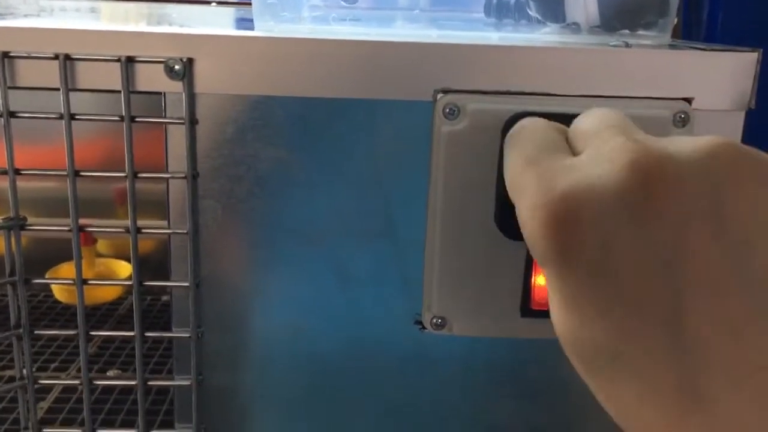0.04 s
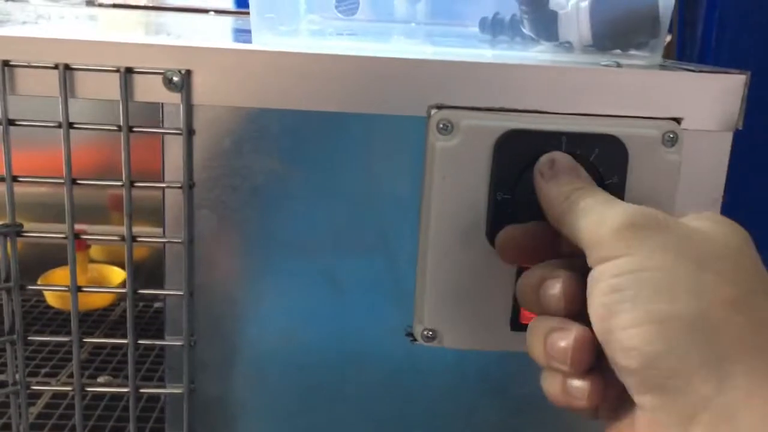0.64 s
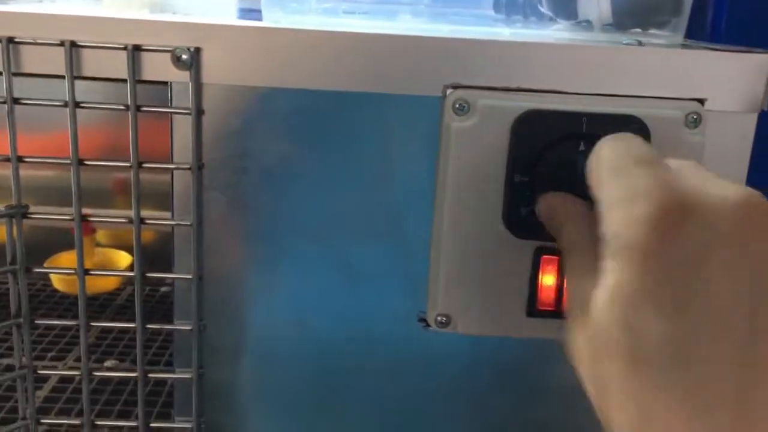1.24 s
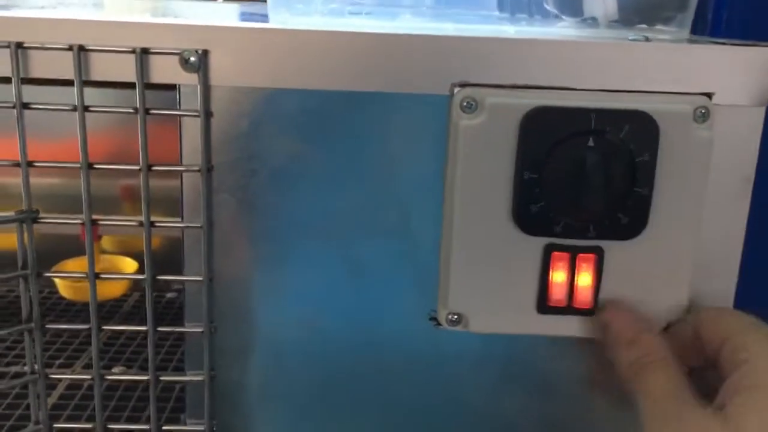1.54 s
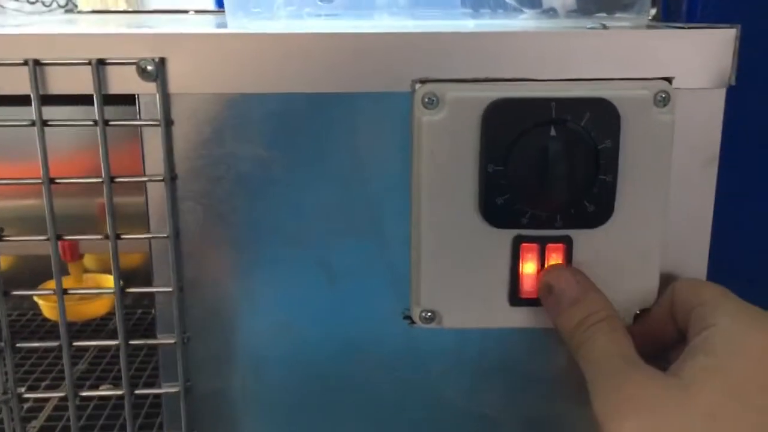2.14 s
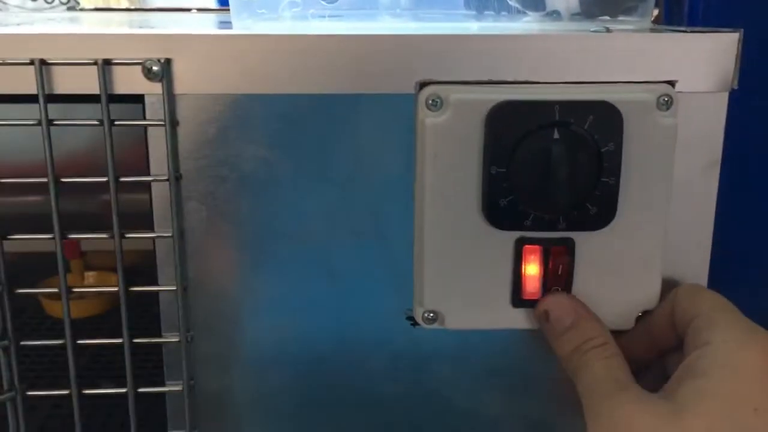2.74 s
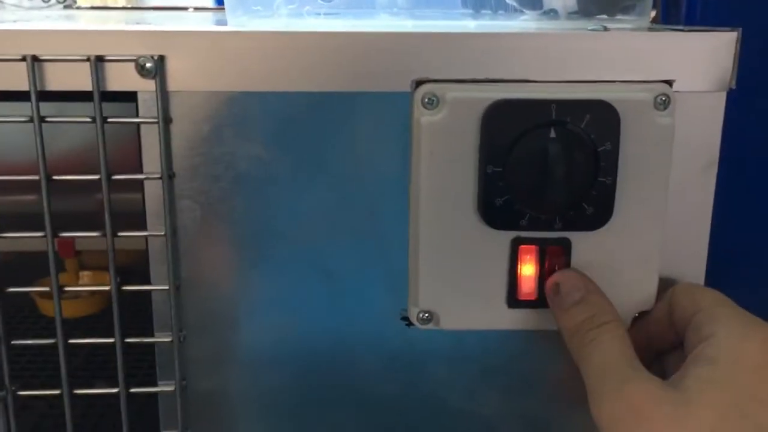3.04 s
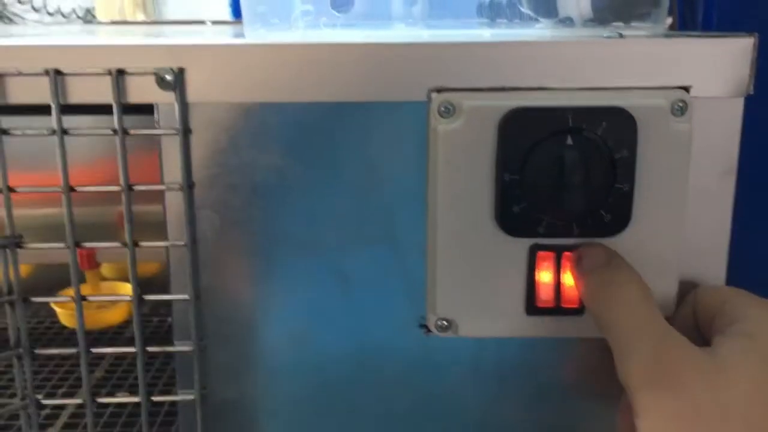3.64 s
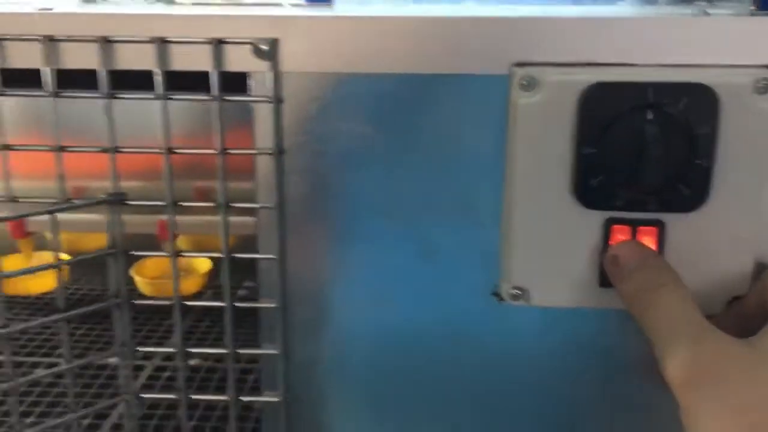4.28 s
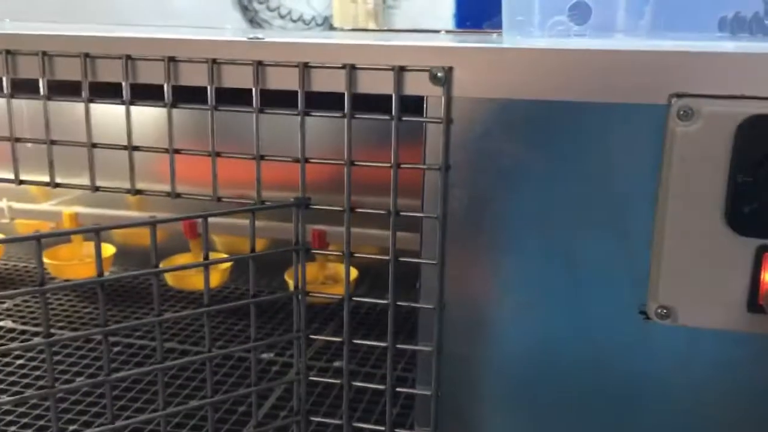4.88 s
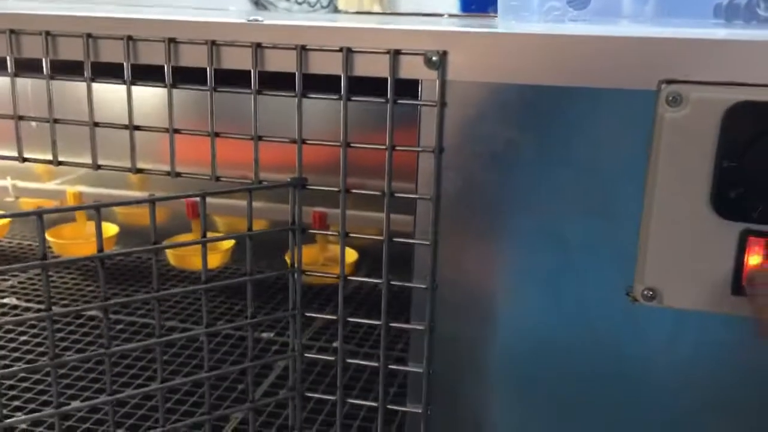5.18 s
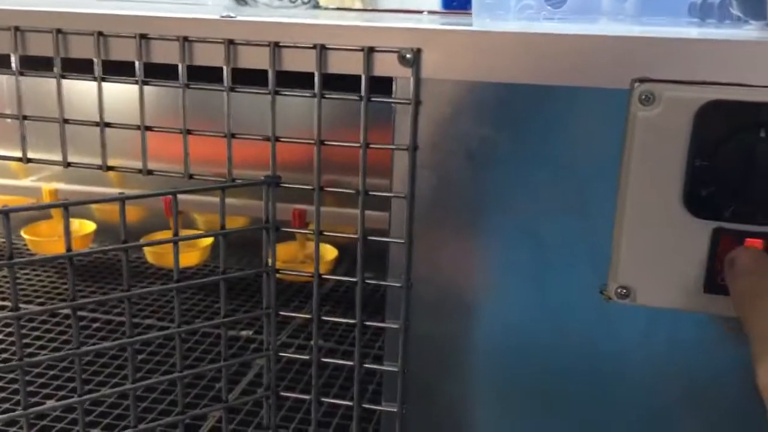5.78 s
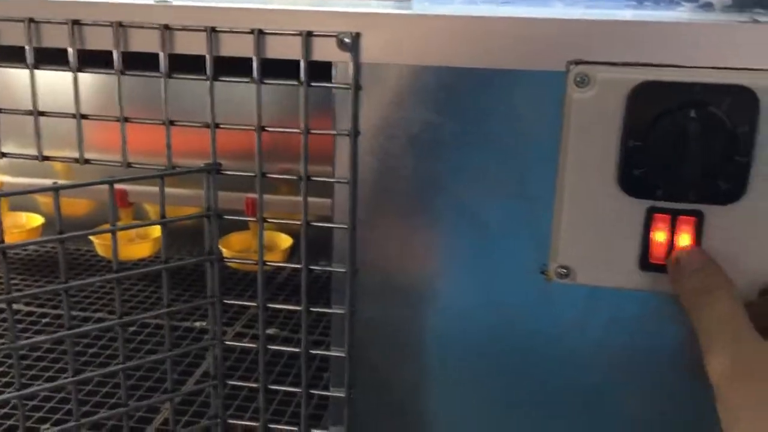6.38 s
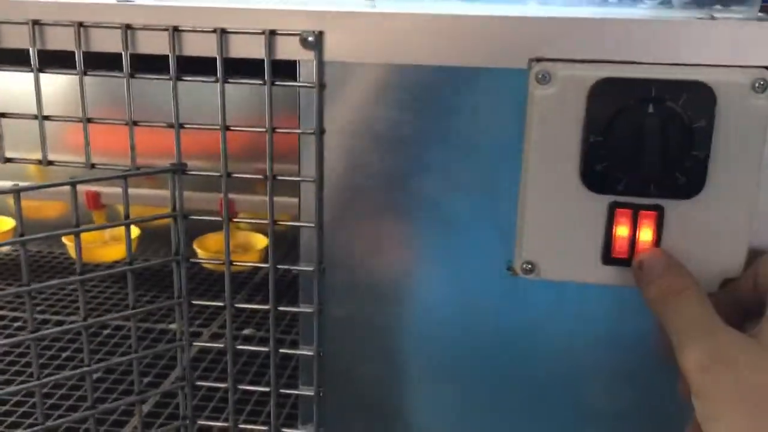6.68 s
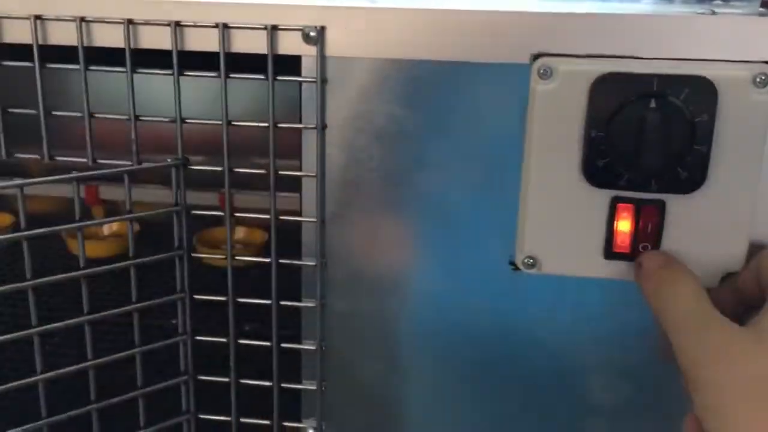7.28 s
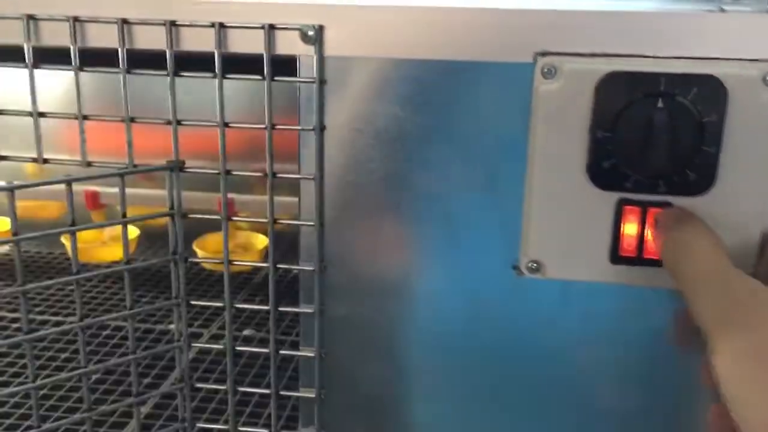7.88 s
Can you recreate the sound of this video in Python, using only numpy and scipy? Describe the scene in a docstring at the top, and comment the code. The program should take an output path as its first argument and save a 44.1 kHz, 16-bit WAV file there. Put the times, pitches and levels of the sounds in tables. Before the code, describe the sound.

Close by, a plastic rocker switch is clicked six times at uneven intervals and with varying force, after a small knock on a dial and some faint finger rubbing. Each crisp snap rings briefly in the metal panel, with a soft cabinet boom and a little room echo. Underneath, the motor of a heated cage keeps up a low, fluttering hum with faint air noise, easing a little under the last clicks.

```python
"""A heated sheet-metal cage hums in a room: its motor throbs over faint air and a wavering rumble.
First comes one knock on the timer dial; then fingers brush and tick on the plastic of the control box.
From 2.5 s a thumb snaps a lit rocker switch back and forth six times. Each snap is three contacts
within milliseconds; the metal panel rings after it, the cabinet booms softly and the room answers.
Near 7 s, under the last snaps, the motor's main tone drops a little."""
import sys
import numpy as np
from scipy import signal
from scipy.fft import next_fast_len
from scipy.io import wavfile
from scipy.ndimage import uniform_filter1d

SR = 44100
rng = np.random.default_rng(int(sys.argv[2]) if len(sys.argv) > 2 else 0)


def to_wav(sig):
    """Store sig (one row per channel, or 1-D mono) as 16-bit WAV at the path in sys.argv[1].

    Samples outside -1..1 are clipped; the rate is SR.
    """
    pcm = np.clip(np.atleast_2d(sig), -1, 1) * 32767
    pcm = np.round(pcm).astype(np.int16)
    wavfile.write(sys.argv[1], SR, pcm.T)  # frames by channels


N = 349257
TIME = np.arange(N) / SR
SPAN = SR   # samples that one snap takes to die away
AGE = np.arange(SPAN) / SR


def from_db(db):
    """Decibels to gain."""
    return 10 ** (np.asarray(db) / 20)


def unit_rms(x):
    """Scale to unit rms."""
    return x / np.sqrt(np.mean(x ** 2) + 1e-20)


def at_hz(table, hz):
    """Read every column of a table at one frequency."""
    freqs, *columns = np.transpose(table)
    return [np.interp(np.log(hz), np.log(freqs), column) for column in columns]


def fade(t60):
    """Exponential decay, 60 dB down after t60 seconds."""
    return np.exp(-np.log(1000) * AGE / t60)


def mode(hz, t60):
    """One damped vibration."""
    return np.sin(2 * np.pi * hz * AGE) * fade(t60)


def band(x, low_hz, high_hz):
    """Band-pass."""
    sos = signal.butter(2, [low_hz, min(high_hz, .47 * SR)], "band", fs=SR, output="sos")
    return signal.sosfilt(sos, x)


def noise_bands(size):
    """Third-octave bands of noise as (centre [Hz], samples); neighbours are unrelated."""
    edges = 25 * 2 ** (np.arange(30) / 3)
    white = rng.standard_normal((2, size + SPAN))
    return [(np.sqrt(low * high), band(white[k % 2], low, high)[SPAN:])
            for k, (low, high) in enumerate(zip(edges, edges[1:]))]


def shuffled(bands):
    """The same bands of noise, each shifted at random in time."""
    return [(hz, np.roll(noise, rng.integers(SPAN))) for hz, noise in bands]


def coloured(spectrum, size):
    """Noise of unit rms with a given spectrum."""
    return unit_rms(sum(from_db(at_hz(spectrum, hz)[0]) * noise for hz, noise in noise_bands(size)))


def add(track, s, sound):
    """Mix a sound into a track at s seconds."""
    start = max(round(s * SR), 0)
    track[start:start + len(sound)] += sound[:N - start]


# level ride of the motor's main tone: (time [s], level [dB])
DRONE_RIDE = [(0.0, -49.5), (1.2, -50.5), (2.6, -47.5), (6.83, -48), (6.95, -52), (7.92, -53)]
# its weaker, steady tones: (frequency [Hz], level [dB])
HUM_TONES = [(43.5, -58.5), (87.5, -67.5), (95.3, -64.5), (111.5, -66), (324.8, -61), (341.0, -64.5),
             (357.3, -72.5), (376.8, -72), (384.7, -65.5), (392.1, -76), (419.4, -70.5), (522.3, -70.5),
             (566.4, -71), (638.1, -71), (643.6, -70.5), (653.6, -66), (725.6, -69), (747.3, -68),
             (873.6, -72.5), (952.2, -70), (1088.9, -67.5), (2350, -71)]
# tones that throb as the rotor turns: (centre [Hz], five levels [dB] from low to high:
# two lower sidebands, the centre, two upper sidebands)
THROB_TONES = [(210.4, -64, -63.5, -61, -58, -76), (269.8, -69, -69, -56, -66.5, -77),
               (297.4, -73, -59.5, -50.5, -65, -58)]


def motor(drone_hz=130.8, drone_trim_db=-.5, rotor_hz=7.925, wander=.0004, scatter_rad=.45):
    """Hum on one wandering speed; sidebands fall roughly into step once a turn, making it flutter."""
    speed = 1 + wander * unit_rms(signal.resample(rng.standard_normal(size=16), N))
    phase_per_hz = 2 * np.pi * np.cumsum(speed) / SR
    hum = sum(from_db(db) * np.sin(hz * phase_per_hz + 2 * np.pi * rng.random())
              for hz, db in HUM_TONES)
    for hz, *levels in THROB_TONES:
        phases = 2 * np.pi * rng.random() + rng.normal(0, scatter_rad, len(levels))
        for k, db in enumerate(levels):
            hum += from_db(db) * np.sin((hz + (k - 2) * rotor_hz) * phase_per_hz + phases[k])
    drone_db = np.interp(TIME, *np.transpose(DRONE_RIDE)) + drone_trim_db
    drone = from_db(drone_db) * np.sin(drone_hz * phase_per_hz)
    return np.sqrt(2) * (hum + drone)


# EQ curve of the air bed: (frequency [Hz], gain [dB])
AIR_EQ = [(30, -16), (45, 0.5), (100, 6), (150, 6.5), (210, 7.5), (330, 9), (480, -1), (800, -1.5),
          (1200, 0.5), (2100, -6.5), (2700, -5.5), (4600, -16.5), (7000, -19), (14500, -34.5)]


def air(level_db=-48.5):
    """Moving air lays a faint, dark rush under everything."""
    return from_db(level_db) * coloured(AIR_EQ, N)


# level ride of the rumble, stronger at first, then a murmur under the hum: (time [s], level [dB])
RUMBLE_RIDE = [(0.0, -53), (2.2, -55), (2.55, -65), (5.9, -61), (7.92, -58)]
# swells on top of that ride: (peak time [s], level [dB])
RUMBLE_SWELLS = [(1.78, -51), (3.62, -53), (6.26, -46.5), (7.14, -45.5), (7.64, -53)]


def rumble(hz=67, half_width_hz=6, waver=.5, rise_s=.1, fall_s=.15, trim_db=-1):
    """A narrow band of bass wavers, now and then swelling quickly and sinking more slowly."""
    bass = band(rng.standard_normal(N + SPAN), hz - half_width_hz, hz + half_width_hz)
    analytic = signal.hilbert(bass, next_fast_len(N + SPAN))[SPAN:SPAN + N]
    carrier = unit_rms(np.cos(np.angle(analytic)))
    wobble = unit_rms(np.abs(analytic) ** waver)
    bed = from_db(np.interp(TIME, *np.transpose(RUMBLE_RIDE))) * wobble
    swells = sum(from_db(db) * np.exp(-((TIME - s) / np.where(TIME < s, rise_s, fall_s)) ** 2)
                 for s, db in RUMBLE_SWELLS)
    return from_db(trim_db) * np.hypot(bed, swells) * carrier


def favour(hz, centre_hz, octaves, depth_db):
    """Bell curve: the spot that is pressed excites modes near one pitch most."""
    bell = np.exp(-(np.log2(hz / centre_hz) / octaves) ** 2)
    return from_db(depth_db * (bell - 1))


def press_eq(hz, pitch_hz, octaves, focus_db, treble_db, shelf_hz=7000):
    """Each press favours one pitch of the rocker and has its own brighter or duller top."""
    shelf = from_db(treble_db / (1 + (shelf_hz / hz) ** 4))
    return favour(hz, pitch_hz, octaves, focus_db) * shelf


# modes of the plastic rocker and its housing: (frequency [Hz], level [dB], t60 [s])
ROCKER_MODES = [(1710, -5.5, 0.0083), (2090, -4.5, 0.0083), (2550, -3, 0.0054), (3208, -6.5, 0.014),
                (4190, -3, 0.0093), (4450, -14, 0.012), (5770, -5, 0.0093), (8000, -22, 0.0093),
                (9400, -16, 0.0051), (11760, -9, 0.011), (14900, -11, .004)]


def rocker(tone):
    """Body of the click: the plastic rings briefly, slightly detuned at each contact."""
    detune = rng.normal(1, .012, len(ROCKER_MODES))
    return sum((-1) ** k * from_db(db) * press_eq(hz, *tone) * mode(hz * detune[k], t60)
               for k, (hz, db, t60) in enumerate(ROCKER_MODES))


# EQ curve of the metal contact's crack: (frequency [Hz], gain [dB])
CRACK_EQ = [(300, 0), (700, -1), (2000, 14), (3200, 9.5), (4500, 11), (5800, 9), (7300, -8), (9500, 13),
            (12000, -4), (16000, -6)]


def contact_grit(bands, tone, trim_db=-6):
    """Bright noise from which the crack of the metal contact is cut."""
    return sum(from_db(at_hz(CRACK_EQ, hz)[0] + trim_db) * press_eq(hz, *tone) * noise
               for hz, noise in bands)


def cage_echo(clicks, level_db=-42, t60=.22, low_hz=1300, high_hz=6500):
    """The metal walls throw a click back and forth, keeping its ring."""
    response = band(rng.standard_normal(SPAN), low_hz, high_hz) * fade(t60)
    return from_db(level_db) * signal.fftconvolve(clicks, response)[:N]


# modes of the sheet-metal panel around the switch: (frequency [Hz], level [dB], t60 [s])
PANEL_MODES = [(717, -35, 0.2), (950, -45, 0.046), (1109, -18, 0.092), (1230, -17.5, 0.19),
               (1291, -18.5, 0.13), (1395, -25, 0.077), (1440, -28, 0.038), (1615, -13, 0.1),
               (1710, -21.5, 0.13), (1788, -18.5, 0.27), (1910, -21, 0.04), (2030, -33, .14),
               (2150, -25.5, 0.23)]


def panel(pitch_hz, trim_db=-4, attack_s=.0031, leak_db=8, leak_t60=.061):
    """Bending waves spread over the sheet; at first they ring louder, then leak into the frame."""
    ring = 0
    for hz, db, t60 in PANEL_MODES:
        gain = from_db(db + trim_db) * favour(hz, pitch_hz, octaves=.53, depth_db=8.5)
        ring += gain * np.sin(2 * np.pi * (hz * AGE + rng.random())) * fade(t60)
    attack = 1 - np.exp(-(AGE / attack_s) ** 2)
    return ring * attack * (1 + from_db(leak_db) * fade(leak_t60))


def panel_echo(bands, pitch_hz, level_db=-12, t60=.66, attack_s=.02):
    """The wide sheet radiates all round, so its pitch lingers in the room."""
    wash = sum(favour(hz, pitch_hz, octaves=.91, depth_db=26) * noise
               for hz, noise in bands if 500 < hz < 3000)
    return from_db(level_db) * wash * fade(t60) * (1 - np.exp(-AGE / attack_s))


# low modes of the cabinet: (frequency [Hz], level [dB], t60 [s], attack [s])
CABINET_MODES = [(154, -41, .65, .03), (168, -37, .65, .025), (241, -40, .42, .006), (256, -40, .3, .006),
                 (329, -32, .17, .004), (350, -40, .22, .004)]


def cabinet():
    """Soft boom: the big walls and the air between them take a few cycles to get going."""
    return sum(from_db(db) * mode(hz * rng.normal(1, .0077), t60) * (1 - np.exp(-AGE / attack_s))
               for hz, db, t60, attack_s in CABINET_MODES)


# the room's reverb on a click: (frequency [Hz], early reflections [dB], tail [dB], tail t60 [s])
ROOM_REVERB = [(150, -8, -10, 1), (446, -11, -6, 0.6), (734, 8, -6.5, 0.34), (1180, 0, -7.5, 0.67),
               (1900, 17.5, -4, 0.83), (2480, -10, -15, 0.44), (4030, -5, -18, 0.86), (5800, -4, -22, 1),
               (7200, -9, -25.5, 0.67), (15000, -17, -26, 0.29)]


def room(bands, tone, early_t60=.059, attack_s=.0024):
    """Dense early reflections off the cage, then the room's tail, shortest at the very top."""
    reverb, early = 0, fade(early_t60)
    for hz, noise in shuffled(bands):
        early_db, tail_db, t60 = at_hz(ROOM_REVERB, hz)
        envelope = from_db(early_db) * early + from_db(tail_db) * fade(t60)
        reverb += noise * press_eq(hz, *tone) * envelope
    return reverb * (1 - np.exp(-(AGE / attack_s) ** 2))


# cue list, one knock on the timer dial and then six snaps of the rocker:
# (time [s], level [dB], pre-click lead [s], pre-click gain [dB], favoured pitch [Hz], width [octaves],
# focus [dB], treble [dB], panel send [dB], panel pitch [Hz], boom level [dB], room send [dB])
SNAP_CUES = [(0.1429, -25.5, .0011, -5, 3400, 0.24, 6, -5, 5, 1000, -8.5, 2),
             (2.5018, -2.5, 0.0015, -17, 3170, 0.83, 9.5, -4.5, -6.5, 1490, 3.5, -4.5),
             (3.4198, -14, .0018, -2, 2150, 0.15, 1.5, -1.5, 0, 1250, 2, -.5),
             (5.3070, -19, 0.00077, 5, 4430, 0.35, 3, -3.5, -2.5, 1780, 0.5, 1.5),
             (6.0669, -8, 0.001138, 3, 3360, 0.27, 12.5, 6.5, -1, 1160, 1.5, 1.5),
             (6.927, -10.5, 0.0019, -6, 2890, 0.4, 6, -4.5, -6.5, 1790, 0, -4),
             (7.772, -20, 0.0015, 3.5, 2800, 0.7, 2.5, 4.5, 6, 1280, -1.5, 3.5)]


def snaps(bands, crack_t60=.0055, bounce_s=.0008, bounce_db=-10, room_trim_db=-9):
    """The spring tips over, the rocker hits its stop and bounces once; panel, cabinet and room answer."""
    clicks, rings = np.zeros(N), np.zeros(N)
    for s, db, lead_s, lead_db, *tone, panel_db, panel_hz, boom_db, room_db in SNAP_CUES:
        grit = contact_grit(bands, tone)
        for delay_s, contact_db in ((-lead_s, lead_db), (0, 0), (bounce_s, bounce_db)):
            crack = np.roll(grit, rng.integers(SPAN)) * fade(crack_t60)
            add(clicks, s + delay_s, from_db(db + contact_db) * (rocker(tone) + crack))
        sheet = panel(panel_hz) + panel_echo(shuffled(bands), panel_hz)
        add(rings, s, from_db(db + panel_db) * sheet)
        add(rings, s, from_db(boom_db) * cabinet())
        add(rings, s, from_db(db + room_db + room_trim_db) * room(bands, tone))
    return clicks + cage_echo(clicks) + rings


# cue list of skin brushing the plastic: (peak time [s], half length [s], level [dB], centre [Hz])
BRUSH_CUES = [(0.260, 0.015, -59, 11300), (1.262, .04, -63.5, 8700), (1.266, .05, -55, 1300),
              (1.43, .012, -70, 14000), (2.4855, .002, -57, 12500)]


def brushes(edge_ratio=1.18, grip_db=3, grip_s=.004):
    """Skin sliding on plastic hisses briefly, catching and slipping as it goes."""
    grip = unit_rms(uniform_filter1d(rng.standard_normal(N), round(grip_s * SR)))
    rub = rng.standard_normal(N) * from_db(grip_db * grip)
    track = np.zeros(N)
    for s, half_s, db, hz in BRUSH_CUES:
        envelope = from_db(db) * np.exp(-((TIME - s) / half_s) ** 2)
        track += envelope * unit_rms(band(rub, hz / edge_ratio, hz * edge_ratio))
    return track


# cue list of light finger touches: (time [s], level [dB], favoured pitch [Hz], treble [dB])
TOUCH_CUES = [(1.0430, -46, 6000, 2), (2.45, -33, 6000, -13), (5.2683, -31.5, 2800, -21)]


def touches(bands, octaves=.61, focus_db=4, rub_db=-10, rub_t60=.003, room_db=-11):
    """A fingertip takes up the slack of the plastic with a tiny tick."""
    track = np.zeros(N)
    rub = from_db(rub_db) * coloured(CRACK_EQ, SPAN) * fade(rub_t60)
    for s, db, pitch_hz, treble_db in TOUCH_CUES:
        tone = pitch_hz, octaves, focus_db, treble_db
        tick = rocker(tone) + rub + from_db(room_db) * room(bands, tone)
        add(track, s, from_db(db) * tick)
    return track


def scene():
    """Mono mix: close clicks and finger noise over a bed of hum, rumble and air."""
    bands = noise_bands(SPAN)
    foreground = snaps(bands) + touches(bands) + brushes()
    bed = motor() + rumble() + air()
    return (foreground + bed)[None]


def record(dry, low_cut_hz=32, high_cut_hz=16300):
    """The microphone drops the deepest bass; the top is cut steeply."""
    low_cut = signal.butter(2, low_cut_hz, "high", fs=SR, output="sos")
    high_cut = signal.ellip(10, .2, 80, high_cut_hz, fs=SR, output="sos")
    return signal.sosfilt(high_cut, signal.sosfilt(low_cut, dry))


dry = scene()
out = record(dry)
to_wav(out)
```